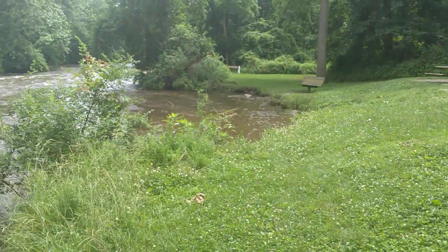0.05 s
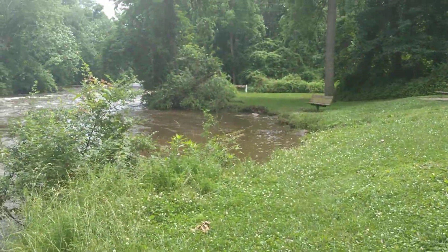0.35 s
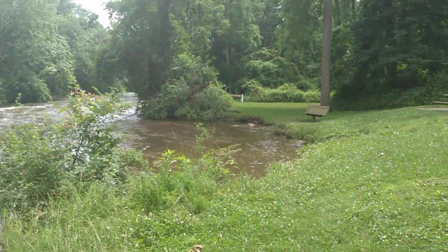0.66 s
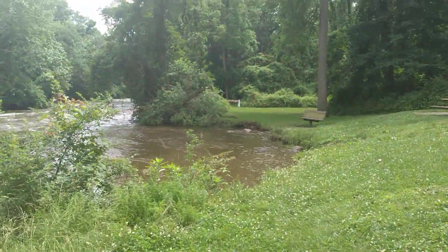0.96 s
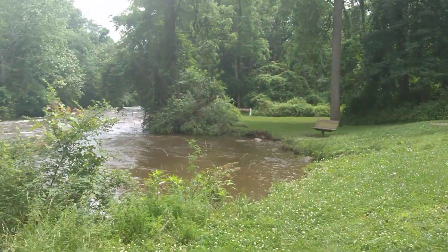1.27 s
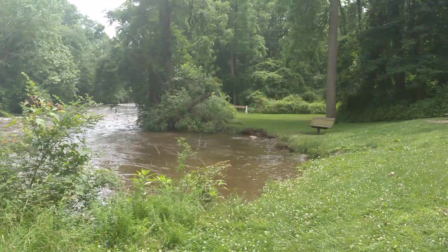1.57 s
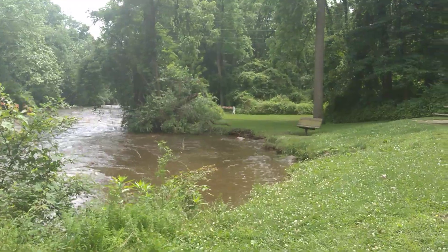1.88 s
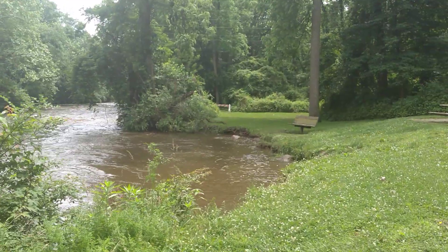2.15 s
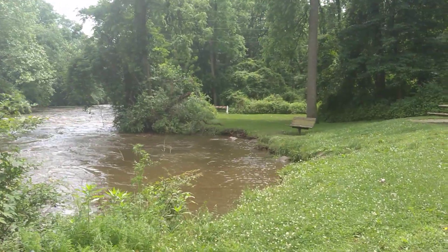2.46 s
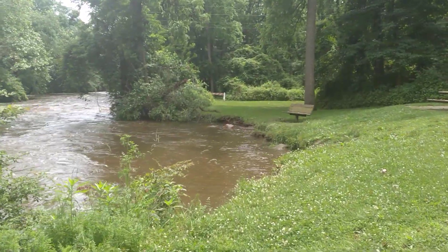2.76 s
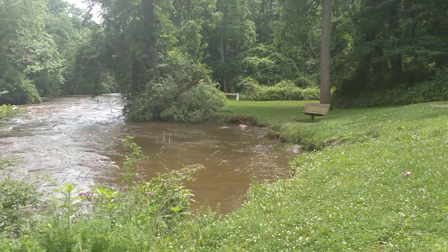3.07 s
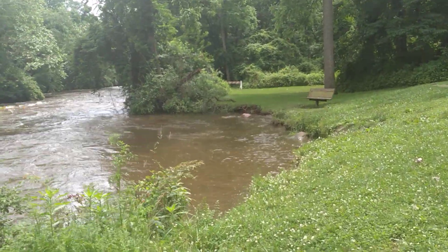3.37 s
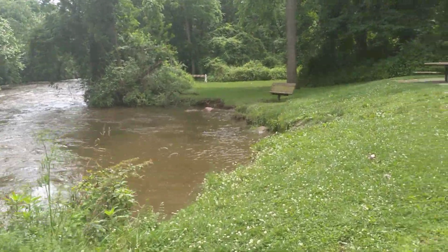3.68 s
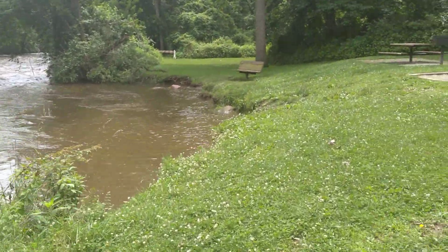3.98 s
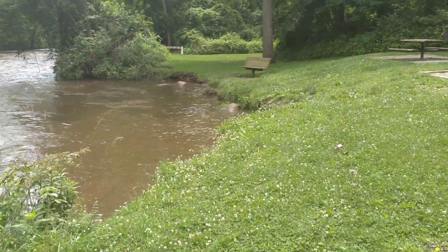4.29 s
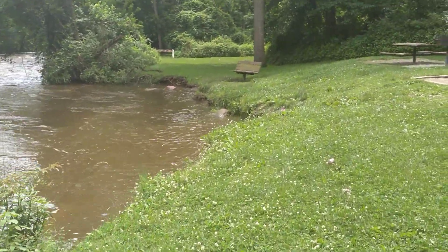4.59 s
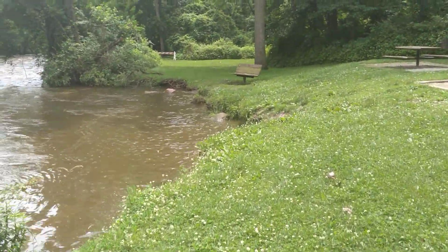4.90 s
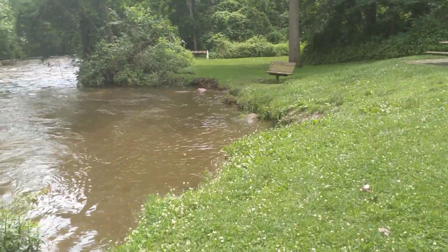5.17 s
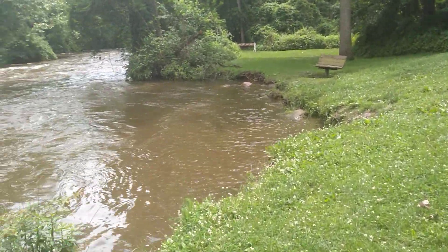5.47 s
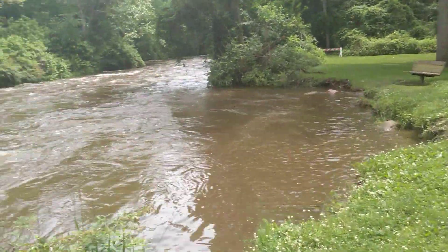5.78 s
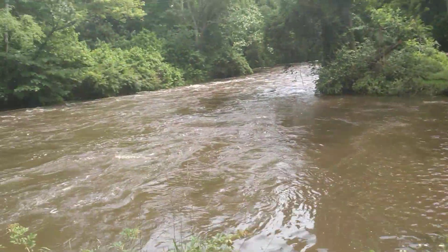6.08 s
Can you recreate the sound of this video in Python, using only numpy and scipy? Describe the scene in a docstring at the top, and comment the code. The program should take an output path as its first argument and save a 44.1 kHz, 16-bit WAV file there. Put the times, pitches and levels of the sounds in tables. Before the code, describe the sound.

Outdoors on a riverbank, fast white water fills the whole stretch with a continuous, slightly hollow rush, swelling briefly as waves fold over. Beneath it, someone carrying the microphone walks through grass with faint swishes, a few soft footfalls and small dry snaps. A light breeze brushes the microphone now and then. The river turns a little duller later on, and short, quiet knocks sound close by toward the end.

```python
"""A swollen river roars over rapids on the left, heard from a handheld camera carried along the bank.
White water churns, big waves fold over trapped air, and bubbles fizz and ring close to the bank.
Grass swishes against each shoe, some footfalls thud and a few dry stems snap. Close to the microphone
come a few short knocks, and a breeze rumbles in its two ports. The camera widens its stereo
by subtracting a delayed share of each port from the other, which hollows the sound."""
import sys
import numpy as np
from scipy import signal
from scipy.fft import rfft, irfft
from scipy.io import wavfile

SR = 44100
rng = np.random.default_rng(int(sys.argv[2]) if len(sys.argv) > 2 else 0)


def log_audio(samples):
    """Write samples as a 16-bit WAV file to the path given in sys.argv[1]."""
    # one column per channel
    frames = np.atleast_2d(samples).T
    # limit to full scale, then quantise
    limited = np.clip(frames, -1, 1)
    pcm = np.round(limited * 32767).astype(np.int16)
    wavfile.write(sys.argv[1], SR, pcm)


N = 275184
TIME = np.arange(N) / SR
HZ = np.maximum(np.arange(N // 2 + 1) * SR / N, 1)
NEAR_LAG_MS, FAR_LAG_MS = 0.406, 0.32   # lead of the left port for the two ends of the rapids


def from_db(db):
    """Decibels to gain."""
    return 10 ** (np.asarray(db) / 20)


def gain_curve(points):
    """Gain at every frequency from rows of f/Hz, level/dB, joined on a log-frequency axis."""
    hz, db = np.transpose(points)
    return from_db(np.interp(np.log(HZ), np.log(hz), db))


def noise(spectrum, channels=2):
    """Unrelated noises with the given dB per Hz."""
    white = rng.standard_normal((channels, N))
    return irfft(rfft(white) * gain_curve(spectrum) * np.sqrt(SR / 2), N)


def noise_band(hz, octaves):
    """Noise of unit RMS in a bell around one pitch."""
    bell = np.exp(-(np.log2(HZ / hz) / octaves) ** 2 / 2)
    band = irfft(rfft(rng.standard_normal(N)) * bell, N)
    return band / np.std(band)


def drift(per_s):
    """A random wander of spread about 1, with per_s new values a second."""
    knots = np.arange(0, TIME[-1] + 2 / per_s, 1 / per_s)
    return np.interp(TIME, knots, rng.standard_normal(len(knots)))


def from_left(x, lag_ms):
    """A sound reaches the left port first and the right one a moment later."""
    return np.array([x, irfft(rfft(x) * np.exp(-2j * np.pi * HZ * lag_ms / 1000), N)])


def churn(x, surge_db, flicker_db, flicker_per_s):
    """Waves pile up and break: all octaves surge together and each one flickers by itself."""
    spectrum, surge, out = rfft(x), drift(7.3), 0
    octave = np.clip(np.log2(HZ / 125), 0, 6)
    for k in range(7):
        band = irfft(spectrum * np.maximum(1 - abs(octave - k), 0), N)
        out += band * from_db(surge_db * surge + flicker_db * drift(flicker_per_s))
    return out


# White water, straight from the rapids on the left: f/Hz, level/dB per Hz
RAPIDS_SPECTRUM = [(30, -100), (80, -67), (160, -62), (250, -57.5), (420, -56.5), (700, -61.5),
                   (1000, -65.5), (1400, -71.5), (2000, -68.5), (2800, -86.5), (4000, -86.5), (6000, -77.5),
                   (10000, -85), (14000, -95)]
def rapids(count=4):
    """Patches of white water at different bearings, each churning on its own."""
    patches = noise(RAPIDS_SPECTRUM, channels=count) / np.sqrt(count)
    out = 0
    for patch, lag_ms in zip(patches, np.linspace(FAR_LAG_MS, NEAR_LAG_MS, count)):
        out += from_left(churn(patch, surge_db=0.5, flicker_db=1.85, flicker_per_s=26), lag_ms)
    return out


# Wash from all round, off the trees and the far riffles: f/Hz, level/dB per Hz
WASH_SPECTRUM = [(30, -108), (90, -86), (160, -65), (250, -73), (450, -67), (1000, -69), (1900, -69.5),
                 (2700, -72), (3500, -72), (4100, -72), (5500, -79.5), (8000, -84.5), (14000, -91)]
def wash(port_span_ms=0.49):
    """Sound from all sides is alike at both ports only where its wavelength is long."""
    mid, side = rfft(churn(noise(WASH_SPECTRUM), surge_db=0.2, flicker_db=1.0, flicker_per_s=18))
    alike = np.sinc(2 * HZ * port_span_ms / 1000)
    return irfft(mid * np.sqrt((1 + alike) / 2) + side * np.sqrt((1 - alike) / 2) * [[1], [-1]], N)


def bubbles(per_s=380, level_db=-42.5, spread_db=4.0, t60_cycles=110, tilt=0.24, pitches=28):
    """Bubbles close to the bank ring as they form, the small ones higher and fainter."""
    fizz = np.zeros(N)
    for hz in np.geomspace(700, 7000, pitches) * np.exp(rng.normal(0, 0.042, pitches)):
        births = np.flatnonzero(rng.random(N) < per_s / pitches / SR)
        strengths = from_db(spread_db * np.minimum(rng.exponential(1, len(births)), 4))
        kicks = np.full(N, 1e-18)
        kicks[births] = strengths * rng.choice([-1, 1], len(births))
        decay = from_db(-60 * hz / (t60_cycles * SR))   # per sample
        feedback = decay * np.cos(2 * np.pi * hz / SR)
        fizz += signal.lfilter([1, -feedback], [1, -2 * feedback, decay ** 2], kicks) / hz ** tilt
    return from_left(from_db(level_db) * fizz / np.std(fizz), FAR_LAG_MS)


def river(split_hz=1000, dip_hz=430, dip_width_hz=130, away_s=3.33, back_s=6.37, turn_takes_s=1.8):
    """The whole rush; it dims as the camera turns to the bank, the hiss more than the roar."""
    water = rapids() + wash() + bubbles()
    spectrum = rfft(water)
    roar = irfft(spectrum / (1 + (HZ / split_hz) ** 2), N)
    hiss = water - roar
    # the low roar around dip_hz slowly thins as the camera moves along the bank
    dip_band = irfft(spectrum * np.exp(-((HZ - dip_hz) / dip_width_hz) ** 2), N)
    roar += dip_band * (from_db(-0.5 - 0.36 * TIME) - 1)
    # 0 facing the water, 1 facing the bank
    turned = np.clip(.5 + np.minimum(TIME - away_s, back_s - TIME) / turn_takes_s, 0, 1)
    return roar * from_db(0.5 - 1.5 * turned) + hiss * from_db(0.64 - 3.5 * turned)


# Wind rumble right on the microphone, for a puff of 0 dB: f/Hz, level/dB per Hz
WIND_SPECTRUM = [(12, -60), (25, -25), (48, -17), (70, -12.5), (110, -20.5), (150, -30), (260, -23),
                 (600, -74)]
# Puffs of breeze across the ports: t/s at the height, length/s, level/dB
PUFFS = [(.45, .26, -48), (1.63, 0.092, -51), (2.1, 0.36, -47), (2.87, 0.33, -51), (3.27, 0.14, -49),
         (4.35, .5, -58), (5.95, 0.32, -52)]
def breeze(air_db=-58.5, fade_db_per_s=0.4, eddy_db=3.5, eddies_per_s=8.1):
    """Air stirs faintly from the start and puffs swell over it; eddies rumble at each port."""
    power = from_db(air_db - fade_db_per_s * TIME) ** 2
    for s, length, db in PUFFS:
        power += from_db(db) ** 2 * np.exp(-(2 * (TIME - s) / length) ** 2)
    return noise(WIND_SPECTRUM) * np.sqrt(power) * from_db(eddy_db * drift(eddies_per_s))


# Big waves out in the rapids, to the left: t/s at the height, length/s, f/Hz, level/dB
BIG_WAVES = [(.15, 0.34, 170, -42), (.25, .5, 420, -35.5), (.61, 0.037, 412, -29.5), (1.2, 0.23, 420, -34),
             (1.278, 0.11, 570, -36.5), (1.5, 0.072, 400, -31), (2.49, .2, 654, -37),
             (2.827, .2, 680, -37.5), (2.9, 0.86, 160, -47), (3.5, 0.97, 745, -42.5), (5.083, .2, 450, -38),
             (5.966, 0.36, 680, -39)]
def breakers():
    """A big wave folds over: its air pockets swell the roar around one pitch."""
    out = 0
    for s, length, hz, db in BIG_WAVES:
        swell = np.exp(-(2 * (TIME - s) / length) ** 2 / 2)
        out += from_db(db) * noise_band(hz, octaves=0.31) * swell
    return from_left(out, FAR_LAG_MS)


# Tips of grass blades at the shoe, below the camera: f/Hz, level/dB per Hz
TIP_SPECTRUM = [(1000, -105), (4000, -97), (7000, -92), (11000, -85), (14000, -88.5)]
def blade_tips(per_s=2200, spread_db=1.5):
    """Countless blade tips click against a shoe, a few harder than the rest."""
    strengths = from_db(spread_db * np.minimum(rng.exponential(1, (2, N)), 4))
    signs = rng.choice([-1, 1], (2, N))
    clicks = strengths * signs * (rng.random((2, N)) < per_s / SR)
    return irfft(rfft(clicks / np.std(clicks)) * gain_curve(TIP_SPECTRUM) * np.sqrt(SR / 2), N)


# Stalks dragging along the shoe: f/Hz, level/dB per Hz
STALK_SPECTRUM = [(300, -109), (1200, -73.5), (3500, -73.5), (5300, -73.5), (7000, -78.5), (14000, -100)]
# Strides along the grassy bank, below the camera:
# t/s at the middle, length/s, flatness (2 swells and fades, 6 holds), stalk level/dB, tip level/dB
STRIDES = [(.23, 0.21, 2.5, -2.5, 0), (.85, .2, 2, -13, -9), (1.48, 0.35, 3, -5, -4),
           (2.24, .12, 2, -10, -1), (2.772, 0.052, 2, 0.5, -1), (2.905, 0.11, 3, 0, 1),
           (3.59, .18, 2.3, -3, 1), (4.195, .19, 6, -4, 0), (4.905, 0.19, 5, -6, 2.6),
           (5.515, .175, 2.8, 1, 2.5), (6.213, 0.11, 2, -2.5, 1)]
def steps(grain_db=1.7, tuft_db=2.1):
    """Each stride sweeps a shoe through tufts of stalks and blade tips: a soft, grainy swish."""
    stalks, tips, out = noise(STALK_SPECTRUM), blade_tips(), 0
    for s, length, flatness, stalks_db, tips_db in STRIDES:
        sweep = np.exp(-abs(2 * (TIME - s) / length) ** flatness / 2)
        out += sweep * (stalks * from_db(stalks_db) + tips * from_db(tips_db))
    return out * from_db(grain_db * drift(250) + tuft_db * drift(30))


# Single bubbles near the bank, to the left: t/s, level/dB, f/Hz, t60/s
SINGLE_BUBBLES = [(1.533, -21.5, 3550, .006), (1.791, -17.5, 470, 0.026), (3.056, -17.5, 483, .02),
                  (3.2083, -22, 5500, .005)]
def plinks():
    """A few single bubbles ring out above the rush, each a dying sine."""
    out = 0
    for s, db, hz, t60 in SINGLE_BUBBLES:
        age = np.clip(TIME - s, 0, 2 * t60)
        out += np.sin(2 * np.pi * hz * age) * from_db(db - 60 * age / t60)
    return from_left(out, FAR_LAG_MS)


# Three dull footfalls on the bank, then a few short knocks close to the microphone:
# t/s, level/dB, f/Hz, t60/s, left over right/dB
THUDS = [(2.17, -23, 135, 0.089, -12), (2.52, -28, 140, .07, -8), (2.77, -23, 150, .08, -6),
         (4.965, -20, 354, 0.043, 3), (4.978, -24, 990, 0.012, 6), (5.755, -19, 120, 0.073, -21),
         (5.795, -20, 72, .08, -21)]
def thuds():
    """Each footfall or knock rings briefly at one pitch, most of them louder on the right."""
    out = np.zeros((2, N))
    for s, db, hz, t60, left_db in THUDS:
        age = np.clip(TIME - s, 0, 2 * t60)
        contact = 1 - np.exp(-2 * hz * age)   # a soft blow builds over half a cycle
        ring = np.sin(2 * np.pi * hz * age) * from_db(-60 * age / t60)
        out += contact * ring * from_db([[db + left_db], [db]])
    return out


# Dry stems underfoot, right of centre: t/s, level/dB, f/Hz, left over right/dB
DRY_STEMS = [(3.1542, -26, 9800, -8), (3.162, -32, 9600, -9), (4.889, -33, 8350, -2),
             (4.963, -35, 11500, -2), (4.9725, -28, 6000, -1)]
def snaps(t60_s=0.0059):
    """A dry stem breaks: its fibres give way in one short, crisp burst."""
    out = np.zeros((2, N))
    for s, db, hz, left_db in DRY_STEMS:
        burst = (TIME >= s) * from_db(-60 * np.clip((TIME - s) / t60_s, 0, 10))
        out += noise_band(hz, octaves=0.49) * burst * from_db([[db + left_db], [db]])
    return out


def scene():
    """The riverbank as it reaches the two microphone ports."""
    return river() + breeze() + breakers() + steps() + plinks() + thuds() + snaps()


# Share of each port that the camera subtracts from the other: f/Hz, level/dB
WIDENING_SHARE = [(200, -1.5), (1100, -1.9), (2100, -.3), (2400, -.3), (3400, -2.4), (4550, -6.3),
                  (6000, -15), (9000, -26.5), (14000, -36)]
# The camera's right channel against its left: f/Hz, level/dB
RIGHT_BALANCE = [(70, -1), (220, 5), (500, 3), (1000, 1), (2000, 0), (2600, 0), (6000, 2.1), (12000, 3.1)]
def record(dry, delay_ms=0.442, cutoff_hz=14300):
    """Each channel loses a delayed, dulled share of the other port; then the top is cut."""
    ports = rfft(dry)
    crossfeed = gain_curve(WIDENING_SHARE) * np.exp(-2j * np.pi * HZ * delay_ms / 1000)
    left, right = ports - crossfeed * ports[::-1]
    low_pass = 1 / np.sqrt(1 + (HZ / cutoff_hz) ** 400)
    return irfft(np.array([left, right * gain_curve(RIGHT_BALANCE)]) * low_pass, N)


dry = scene()
out = record(dry)
log_audio(out)
```